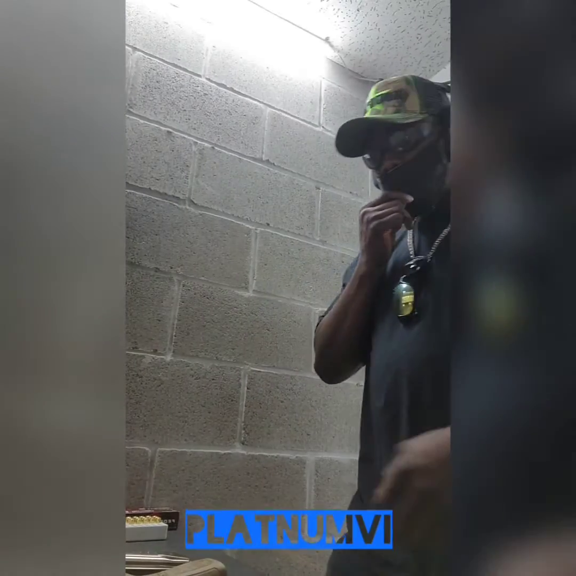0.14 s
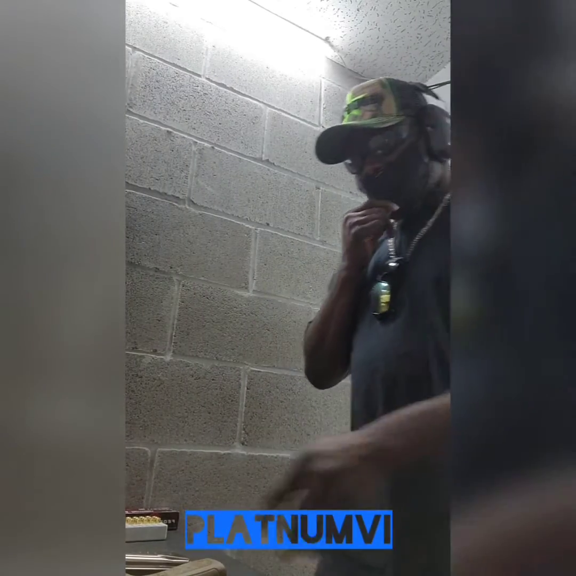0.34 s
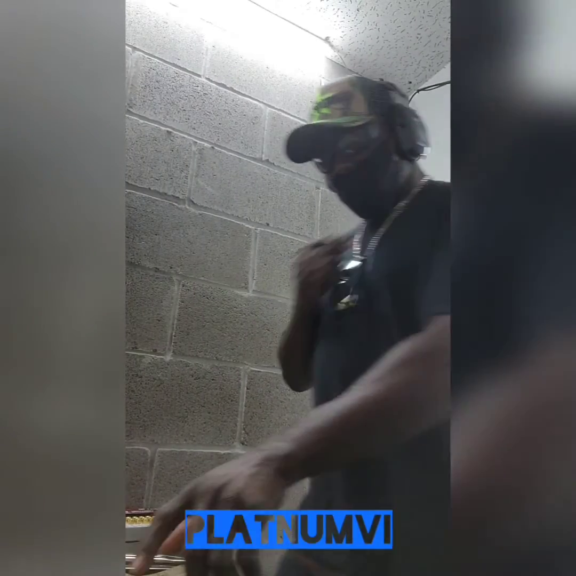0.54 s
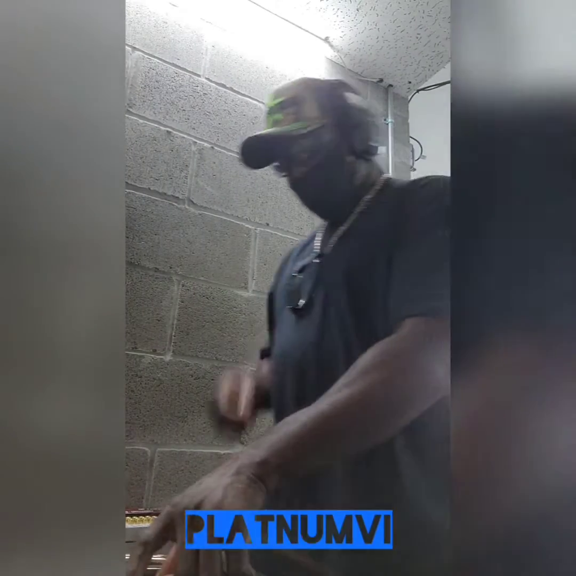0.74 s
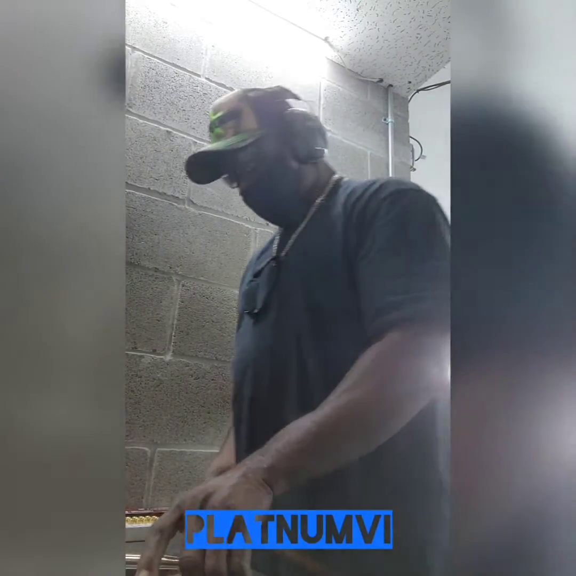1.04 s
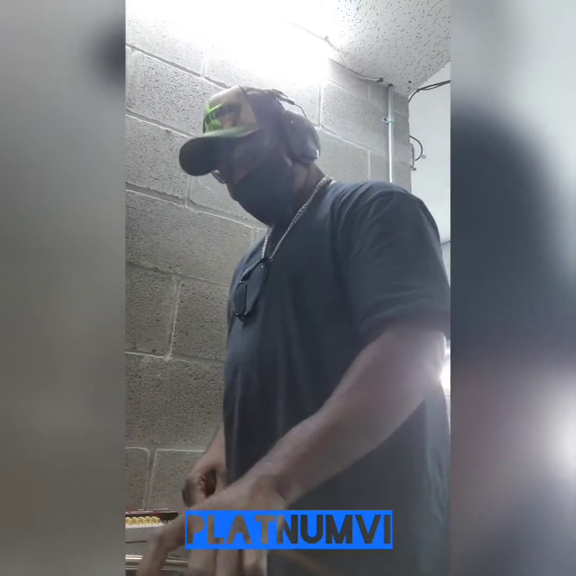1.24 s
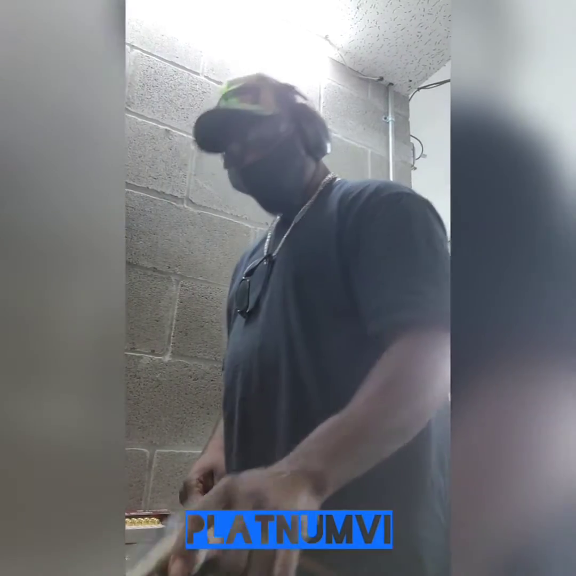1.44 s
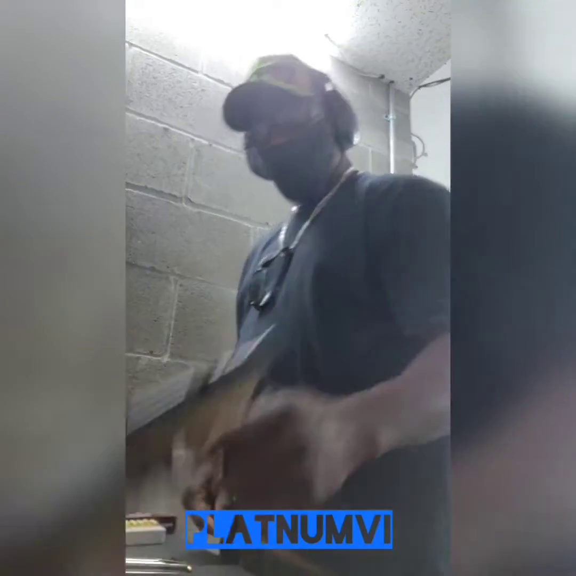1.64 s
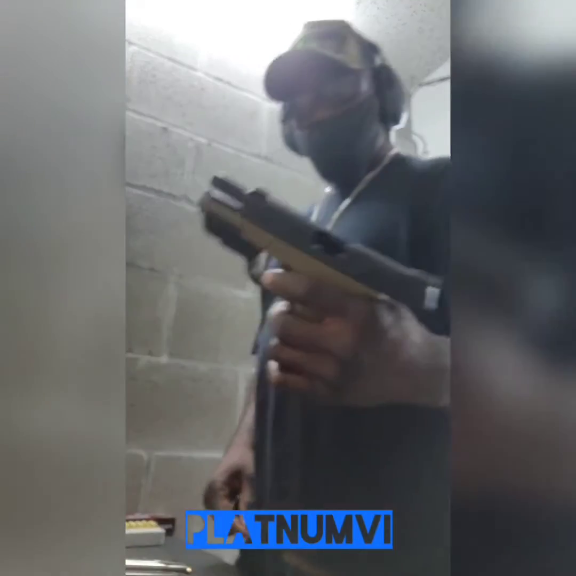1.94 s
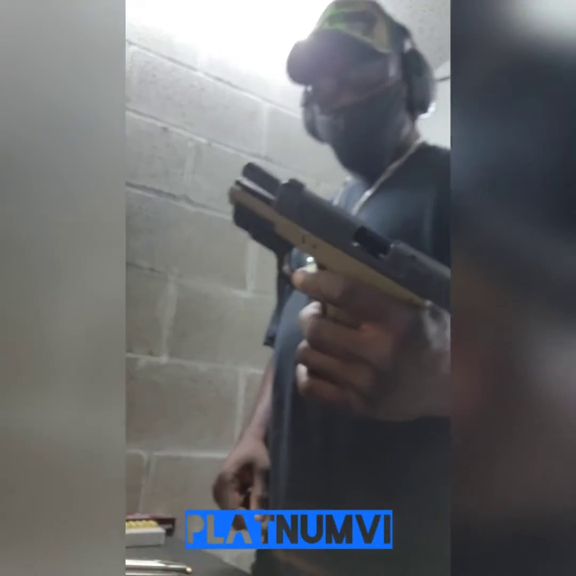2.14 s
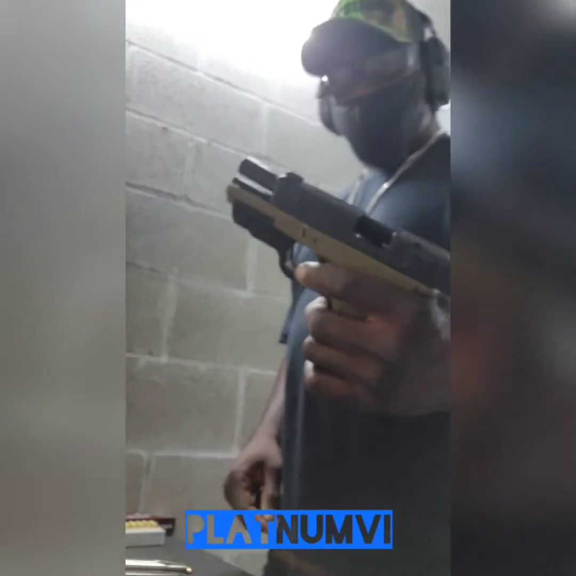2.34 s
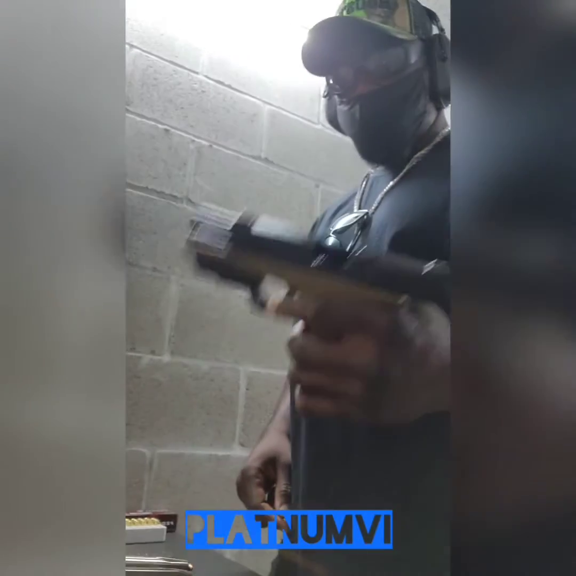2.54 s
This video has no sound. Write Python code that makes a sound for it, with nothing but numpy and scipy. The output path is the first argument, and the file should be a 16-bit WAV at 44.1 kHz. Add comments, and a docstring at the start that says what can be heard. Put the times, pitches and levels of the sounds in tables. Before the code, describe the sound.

One gunshot cracks and echoes off hard walls over rumbling ventilation, with small handling noises nearby

```python
"""In a concrete shooting range, one pistol shot from a neighbouring lane rings over ventilation rumble and a
low hum. The shot is noise and wall echoes that die away, joined by standing waves made of fading sines. Close
by, a hand knocks the bench and small metal parts tick (sines); cloth and gear rustle (noise bursts). The
ventilation is coloured noise plus a wavering sine, which also carries the room's low boom after the shot. A
gain control sinks after the shot and creeps back."""
import sys
import numpy as np
from scipy import signal
from scipy.fft import rfft, irfft, next_fast_len
from scipy.io import wavfile
from scipy.ndimage import uniform_filter1d, map_coordinates

SR = 44100
rng = np.random.default_rng(int(sys.argv[2]) if len(sys.argv) > 2 else 0)


def transcribe(u):
    """Save the signal u as a 16-bit wav file named by the first command-line argument.

    u: samples, shape (n,) or (channels, n), limited to [-1, 1]; the rate is SR.
    q: integer samples, one column per channel.
    """
    v = np.clip(np.atleast_2d(u).T, -1, 1)
    q = np.round(v * 32767).astype(np.int16)
    wavfile.write(sys.argv[1], SR, q)


N = 119070  # length in samples

SHOT_S = 1.405  # moment of the shot, s
WINDOW = SR // 10  # 0.1 s in samples, for judging loudness


def shot():
    """The blast comes by the walls: single slaps, a dense early decay and a long late one, each band at its pace."""
    # colour of the shot in the hall: f/Hz, level/dB per Hz
    blast = [(60, -65), (100, -26), (200, -16), (280, -13), (385, -12), (610, -13.5), (810, -13),
             (1000, -14), (1480, -15.5), (1700, -16), (2400, -17.5), (3100, -19.5), (3700, -21.5),
             (5000, -19.5), (7500, -22), (9500, -24.5), (12000, -22), (14000, -24), (15000, -23),
             (15900, -36)]
    # upper resonances of the lanes: f/Hz, width/Hz, strength/dB (a quarter of it counts)
    hall = [(1770, 71, -24.5), (2000, 50, -4), (2290, 36, -6), (3210, 330, -0.5)]
    # how slowly each band swells: f/Hz, build-up time/s
    build = [(200, 0.051), (350, 0.0022), (1200, 0.0028), (3000, 0.013), (5000, 0.017), (12000, 0.021)]
    # early decay: f/Hz, time to fall 60 dB/s
    early_t60 = [(150, 1.2), (300, 0.87), (600, 1), (1500, 0.26), (4000, 0.37), (8000, 0.37), (15000, 0.28)]
    # far end of the hall: f/Hz, starting level against the early sound/dB
    late_level = [(150, 7), (400, -14.5), (1000, -11), (3000, -12.5), (8000, -16), (15000, -9.5)]
    # late decay: f/Hz, time to fall 60 dB/s
    late_t60 = [(200, 1.4), (1500, 2.08), (5000, 1.64), (15000, 0.51)]
    # left-right likeness: f/Hz, likeness (1 = same, 0 = unrelated)
    shot_alike = [(60, 1), (290, .993), (640, .66), (1410, .08), (3100, .1), (6800, 0)]
    # left-right balance: f/Hz, left minus right/dB
    shot_balance = [(60, -8.5), (180, 0.5), (550, -2), (1650, 3), (4970, 0), (15000, -0.5)]
    # first, clear arrivals: t/s, level against a slap of gain 1/dB, left minus right/dB
    first = [(1.4088, -3, 9), (1.4117, 5, 0), (1.4135, 6, -1.5), (1.4147, -1, -10), (1.416, -7, -3.5)]
    shot_db = -14.5  # rms level of the first 0.1 s
    build_steep, patch_db = 3, 2
    slap_count, slap_spread_s, slap_db, slap_t60_s = 40, 0.14, 7.5, 0.58

    start = round(SHOT_S * SR)
    noise = rng.standard_normal((2, N))
    hz, t, z = signal.stft(noise, SR, nperseg=128, noverlap=96)
    t = np.maximum(t - SHOT_S, 0)

    def column(points):
        """One value for each frequency band."""
        return along(points, hz)[:, None]

    def decaying(decay):
        """The swelling noise bands, faded and turned back into sound."""
        return signal.istft(z * decay, SR, nperseg=128, noverlap=96)[1][:, :N]

    z = patchy(z, patch_db) * (1 - np.exp(-(t / column(build)) ** build_steep))
    dense = decaying(amp(-60 * t / column(early_t60)))
    late = decaying(amp(column(late_level) - 60 * t / column(late_t60)))

    # random wall echoes, drawn apart for left and right, crowded towards the start
    when, size, sign = rng.random((2, slap_count, 3)).transpose(2, 0, 1)
    delay = .01 + slap_spread_s * when ** 1.5
    height = np.sign(sign - .5) * (0.14 + size) * amp(-60 * delay / slap_t60_s)
    place = start + (delay * SR).astype(int)
    slaps = np.array([np.bincount(p, h, N) for p, h in zip(place, height)])
    for k, (s, db, pan) in enumerate(first):
        slaps[:, round(s * SR)] += (-1) ** k * amp(db + pan * np.array([.5, -.5]))
    slaps = filtered(slaps, lambda f: 1 / (1 + 1j * f / 2000) ** 3)  # dulls the clicks

    early = filtered(dense + amp(slap_db) * slaps, lambda f: humps(hall, 6, f))
    x = spread(early + late, lambda f: amp(along(blast, f)), shot_alike, shot_balance)
    return amp(shot_db) * x / np.std(x[:, start:start + WINDOW])


def boom():
    """Standing waves swell after the shot, beat unevenly and die; the higher ones differ from left to right."""
    # standing waves of the lanes: f/Hz, level/dB, delay after the shot/s, build-up/s, time to fall 60 dB/s
    waves = [(148.4, -27, 0.063, 0.06, 1.2), (207.6, -27.5, 0.055, 0.035, 0.61),
             (225.5, -14.5, .17, 0.025, .4), (262.2, -18.5, 0.19, 0.0373, 0.57), (290, -11.5, .07, .07, .5),
             (329.8, -16, 0.1357, 0.014, 0.22), (384.3, -11.5, .002, 0.032, 0.63),
             (415, -20, 0.00302, 0.012, 0.68), (491.8, -11.5, 0.028, 0.0088, 0.31),
             (558, -17.5, 0.092, 0.019, 0.32), (683, -19, 0.0023, 0.022, 0.42),
             (725, -10, .035, 0.0122, .2), (800, -20.5, 0.0612, 0.017, 0.38), (835, -14, .07, 0.012, .18),
             (910, -25, 0.076, .03, .5), (988, -14.5, .035, 0.0117, 0.19), (1019, -13, 0.0028, .008, 0.2),
             (1189, -25, .015, .02, 0.56), (1310, -26.5, 0.035, .02, .35), (1470, -22, .065, 0.0074, .25),
             (1478, -12.5, 0.00302, 0.005, 0.18), (3100, -25, .011, .004, .12)]
    waver_db, apart_hz = 1.5, 1700  # level waver; pitch scale at which the sides part
    phases = rng.random((len(waves), 2))
    sides = np.array([[.5], [-.5]])
    total = 0
    for (hz, db, delay, build, t60), (u, v) in zip(waves, phases):
        turn = u + sides * (v - .5) * (hz / apart_hz) ** 2
        level = db + waver_db * wobble(22)
        total = total + ring(SHOT_S + delay, hz, level, t60, build, turn)
    return total


def bench_knock():
    """A hand knocks the bench: a few low tones start together and die quickly."""
    # tones of the bench: f/Hz, level against the knock level/dB, time to fall 60 dB/s
    bench = [(151.8, 0, .55), (202, 2, 0.11), (279, 3.5, 0.056), (337, 2, 0.052)]
    knock_s, knock_db, attack_s = 1.1065, -19, 0.0024
    return sum(ring(knock_s, hz, knock_db + db, t60, attack_s) for hz, db, t60 in bench)


def rustling():
    """Cloth and gear rub: bursts of grainy noise that swell and fade, each with its own brightness."""
    # bursts: peak t/s, level before the brightness tilt/dB, rise/s, fall/s, left minus right/dB,
    # brightness/dB per octave
    rustles = [(.08, -65.5, 0.081, 0.025, 0, -5.5), (.28, -67, 0.036, 0.024, 0, -2.5),
               (.4, -62, 0.011, .015, 0, -6), (.53, -65.5, 0.011, 0.017, 0, 0),
               (.628, -56.5, 0.012, .012, -3, -3.5), (1.0, -64.5, 0.062, .03, -2.5, 0),
               (1.05, -56.5, 0.033, 0.027, -2, -2), (1.13, -62, 0.02, 0.02, -2, 4),
               (1.18, -54.5, .03, 0.034, -3.5, 0.5), (1.222, -51, 0.021, 0.026, -6, 2.5),
               (1.37, -53.5, 0.026, 0.13, -7, -3), (1.975, -48, 0.014, 0.048, -1.5, 6),
               (2.6, -62.5, .02, 0.052, -3, -10.5)]
    # colour of the cloth: f/Hz, level/dB per Hz
    cloth_colour = [(3500, -35), (6000, -26), (7000, -6.5), (7960, -7.5), (9900, -12), (11000, -1.5),
                    (11800, 1), (13600, -9.5), (15000, -6.5), (15900, -14.5)]
    roundness, grain_db = 1.2, 1
    t = np.arange(N) / SR
    grain = rng.standard_normal((2, N)) * amp(grain_db * wobble(600))
    cloth = unit(filtered(grain, lambda f: amp(along(cloth_colour, f)) / (1 + (4500 / (f + 1)) ** 4)))
    total = 0
    for s, db, rise, fall, pan, bright_db in rustles:
        swell = np.exp(-(np.abs(t - s) / np.where(t < s, rise, fall)) ** roundness)
        # brightness tilts around 11.5 kHz
        tilted = filtered(cloth, lambda f: amp(bright_db * np.log2((f + 1) / 11500)))
        total = total + amp(db + pan * np.array([[.5], [-.5]])) * swell * tilted
    return total


def metal_ticks():
    """Small metal parts tick: short rings, roughened by a fast random change of level on each side."""
    # ticks: t/s, f/Hz, level before roughening/dB, time to fall 60 dB/s
    ticks = [(0.609, 3050, -39.5, 0.1), (.612, 2575, -41, 0.074), (0.625, 2620, -36, 0.12),
             (.628, 3060, -41, 0.075), (.622, 10300, -53, .05), (.624, 11250, -58, .06),
             (.675, 3220, -47.5, 0.29), (0.741, 3070, -39, 0.1), (.746, 2750, -43, .08),
             (.995, 3260, -47, 0.57), (1.926, 12150, -60, .4), (1.965, 11900, -46, 0.12),
             (1.995, 5880, -47, .15), (2.572, 12260, -61, 0.34), (2.581, 5440, -48, 0.15)]
    rings = sum(ring(s, hz, db, t60, 0.0026) for s, hz, db, t60 in ticks)  # attack 2.6 ms
    return rings * np.array([0.7 + 0.45 * wobble(500), 0.65 + .45 * wobble(500)])


def ventilation():
    """Air noise through duct resonances, an upper hiss, and a low tone that wavers in pitch and level: duct
    hum, joined by the room's low boom after the shot."""
    # colour of the air noise: f/Hz, level/dB per Hz
    air_colour = [(15, -59), (25, -10), (38, -15), (59, -17), (80, -1.5), (100, -9), (115, -17), (151, -16),
                  (178, -22.5), (271, -14.5), (332, -20), (421, -19.5), (642, -30), (771, -32), (2000, -41),
                  (2600, -46), (4400, -120)]
    # duct resonances: f/Hz, width/Hz, strength/dB (a quarter of it counts)
    duct = [(153, 29, -7.5), (202.1, 27, 10), (278.3, 10, 11), (390, 13, -23.5)]
    # upper hiss over time: t/s, level before a lift of 4.5 dB/dB
    hiss_level = [(0, -52.5), (.36, -52), (.89, -50), (1.37, -49), (2.0, -51.5), (2.3, -53.5), (2.7, -54)]
    # colour of the hiss: f/Hz, level/dB per Hz
    hiss_colour = [(800, 7.5), (1700, -2), (2300, -7), (3100, 0.5), (3700, -3.5), (4800, -6.5),
                   (5600, -7.5), (6500, -15.5), (8500, -22), (10000, -25), (12500, -22), (15800, -23.5)]
    # low tone, duct hum that swells with the room's low boom after the shot: t/s, f before the random waver/Hz,
    # level before a lift of 5 dB and a waver/dB
    hum_path = [(0.0, 48.2, -33), (0.08, 52, -30.5), (0.16, 53.6, -38), (0.19, 52.6, -28.5),
                (0.34, 52.5, -28.5), (0.38, 53.2, -59), (0.44, 53.2, -21.5), (0.53, 55.5, -38),
                (0.558, 54, -24), (0.59, 54.3, -25), (0.62, 53.2, -55), (0.669, 52.9, -23),
                (0.72, 53.1, -48.5), (0.76, 54.4, -23), (0.83, 53.6, -26), (0.88, 52.5, -32.5),
                (1.01, 54.1, -22.5), (1.13, 54.4, -33), (1.179, 57.6, -24.5), (1.219, 56.3, -54),
                (1.252, 54.3, -32.5), (1.37, 55.1, -25), (1.439, 58.26, -40), (1.5, 57.6, -19.5),
                (1.54, 55.8, -20), (1.59, 56, -30), (1.63, 55.6, -17.5), (1.69, 54, -26),
                (1.74, 55.46, -19.5), (1.83, 59.5, -19.5), (1.87, 60.4, -30.5), (1.9, 58.6, -20),
                (2.1, 59.75, -35), (2.141, 60.4, -25.5), (2.26, 53.4, -35.5), (2.46, 53.65, -20.5),
                (2.49, 54, -28), (2.57, 52.7, -29), (2.6, 51.4, -27.5), (2.7, 54, -33)]
    air_db, hum_pan_db = -30.5, 0.43  # middle level of the air; size of the hum's left-right sway
    t = np.arange(N) / SR

    air = rush(lambda f: amp(along(air_colour, f)) * humps(duct, 6.34, f), patch_db=1.6)
    air = amp(air_db + 0.34 * wobble(3.7)) * air

    hiss = rush(lambda f: amp(along(hiss_colour, f)) / (1 + (500 / (f + 1)) ** 4), patch_db=3.0)
    hiss = amp(np.interp(t, *np.transpose(hiss_level)) + 4.5) * hiss

    s, hz, db = np.transpose(hum_path)
    pitch = np.interp(t, s, hz) + 3.155 * wobble(15)
    turns = np.cumsum(pitch) / SR + rng.random()
    hum = amp(np.interp(t, s, db) + 5 + 0.69 * wobble(3.4)) * np.sin(2 * np.pi * turns)
    return air + hiss + hum * amp(hum_pan_db * np.outer([1, -1], wobble(3.98)))


def rush(gain, patch_db):
    """Patchy stereo air noise of rms 1."""
    # left-right likeness of the air: f/Hz, likeness (1 = same, 0 = unrelated, below 0 = opposed)
    air_alike = [(60, 1), (130, 0.99), (290, 1), (640, 0.83), (1410, -0.18), (3100, 0.2), (6820, -0.17),
                 (15000, 0.095)]
    # left-right balance of the air: f/Hz, left minus right/dB
    air_balance = [(60, 0.5), (180, 0.5), (550, -2.5), (1650, 2), (4970, 1), (15000, 0)]
    z = signal.stft(rng.standard_normal((2, N)), nperseg=512)[2]
    z = patchy(z, patch_db)
    pair = signal.istft(z, nperseg=512)[1][:, :N]
    return unit(spread(pair, gain, air_alike, air_balance))


def ring(start_s, hz, db, t60, attack_s, turn=0):
    """One tone that starts softly and dies, falling 60 dB in t60 seconds; turn shifts its phase in cycles."""
    t = np.maximum(np.arange(N) / SR - start_s, 0)
    fade = amp(db - 60 * t / t60) * (1 - np.exp(-t / attack_s))
    return fade * np.sin(2 * np.pi * (hz * t + turn))


def patchy(z, depth_db):
    """Random loud and soft patches over a short-time spectrum."""
    field = rng.standard_normal(z.shape[1:])
    field = uniform_filter1d(field, size=4, axis=0)  # across frequency
    field = uniform_filter1d(field, size=14, axis=1)  # across time
    return z * amp(depth_db * np.clip(unit(field), -2, 2))


def spread(pair, gain, alike, balance):
    """Two unrelated signals become a coloured left and right, as alike as asked at each frequency."""
    def mix(hz):
        turn = np.arccos(np.clip(along(alike, hz), -1, 1)) / 2
        return gain(hz) * np.array([np.cos(turn), np.sin(turn)])

    mid, side = filtered(pair, mix)
    stereo = np.array([mid + side, mid - side])
    return filtered(stereo, lambda hz: amp(np.outer([.5, -.5], along(balance, hz))))


def humps(peaks, lift_db, hz):
    """Gain that rises at each resonance, by the lift plus a quarter of its strength (never below 0 dB)."""
    return amp(sum(max(lift_db + db / 4, 0) / (1 + (2 * (hz - c) / w) ** 2) for c, w, db in peaks))


def filtered(x, response):
    """x times a response of frequency."""
    m = next_fast_len(N + SR // 2)
    return irfft(rfft(x, m) * response(np.fft.rfftfreq(m, 1 / SR)), m)[..., :N]


def wobble(rate):
    """A smooth random curve through rate random points a second."""
    knots = rng.standard_normal(int(N * rate / SR) + 4)
    return map_coordinates(knots, [np.arange(N) * rate / SR])


def along(points, hz):
    """Read a value between (f/Hz, value) points on a log frequency axis."""
    f, v = np.transpose(points)
    return np.interp(np.log(hz + 1), np.log(f + 1), v)


def unit(x):
    """Scale to rms 1."""
    return x / np.sqrt(np.mean(x ** 2) + 1e-20)


def amp(db):
    """dB to gain."""
    return 10 ** (np.asarray(db) / 20)


def scene():
    """Everything in the range."""
    handling = bench_knock() + rustling() + metal_ticks()
    return shot() + boom() + handling + ventilation()


def record(dry):
    """Gain control sinks slowly after loud sound and creeps back; then soft clipping and a top frequency limit."""
    duck_from_db, duck_share = -22, 0.96  # this share of the level above the threshold is taken off
    attack_s, recover_db_per_s = 0.25, 6.5
    clip_top, clip_hardness, top_hz = .95, 6, 15920
    t = np.arange(N) / SR

    power = signal.fftconvolve(np.mean(dry ** 2, 0), np.ones(WINDOW) / WINDOW)[:N]
    level_db = 10 * np.log10(np.abs(power) + 1e-12)
    over = duck_share * np.maximum(level_db - duck_from_db, 0)
    # hold the deepest cut, letting it go at a steady pace
    held = np.maximum.accumulate(over + recover_db_per_s * t) - recover_db_per_s * t
    # two equal smoothing stages make the cut come on slowly
    pole = np.exp(-1 / (attack_s * SR))
    cut_db = signal.lfilter([(1 - pole) ** 2], np.convolve([1, -pole], [1, -pole]), held)

    x = dry * amp(-cut_db)
    x = x / (1 + np.abs(x / clip_top) ** clip_hardness) ** (1 / clip_hardness)
    return filtered(x, lambda hz: hz < top_hz)


dry = scene()
out = record(dry)
transcribe(out)
```